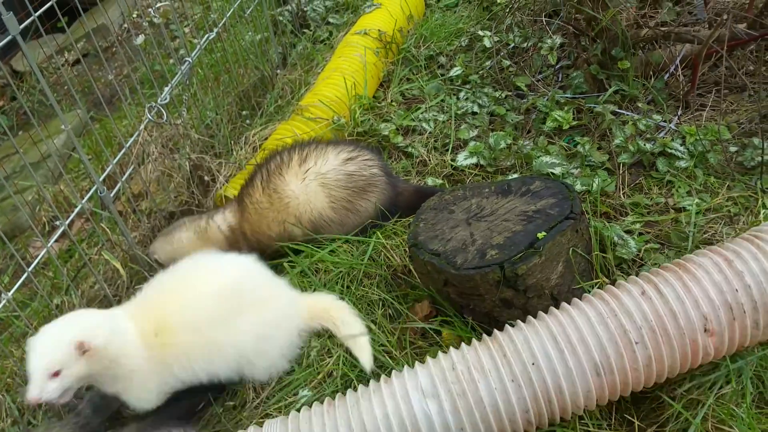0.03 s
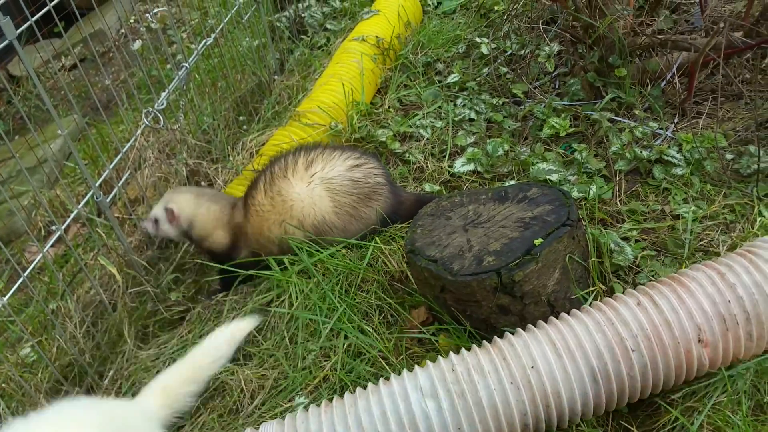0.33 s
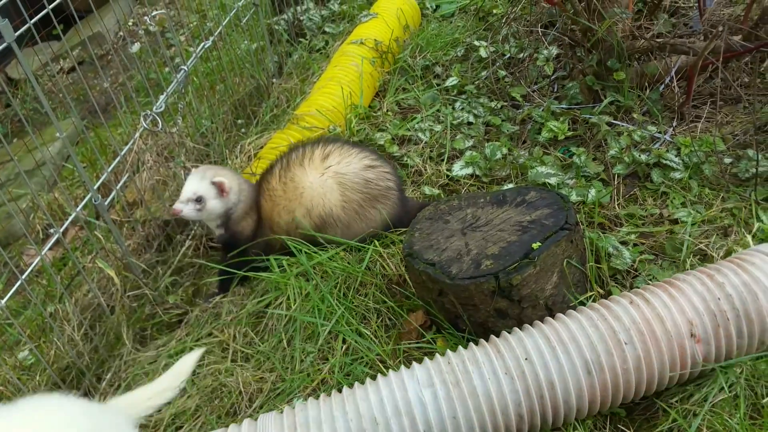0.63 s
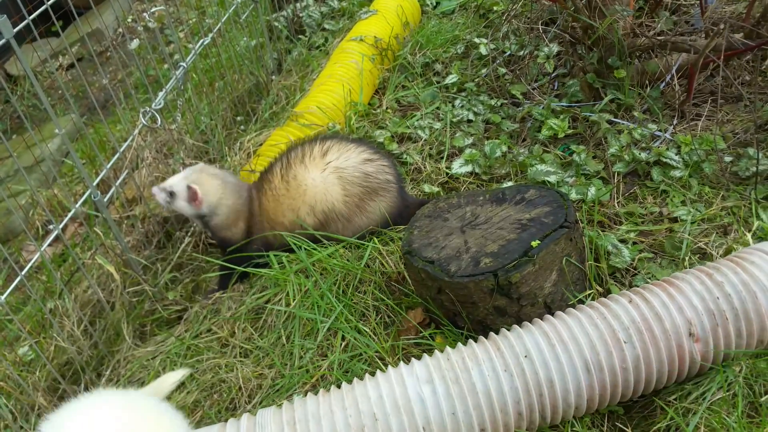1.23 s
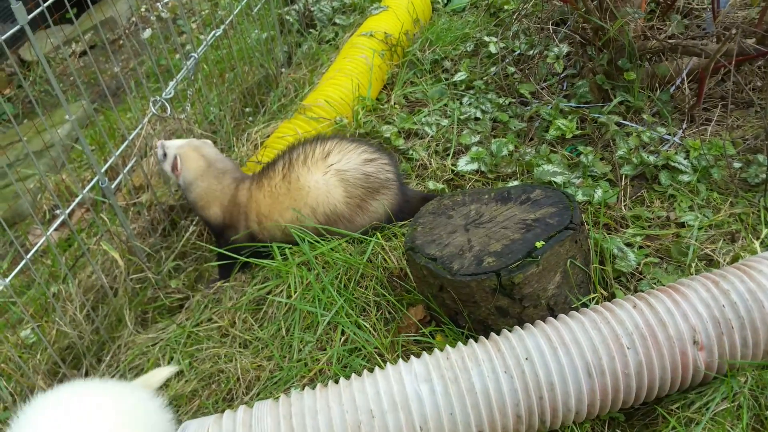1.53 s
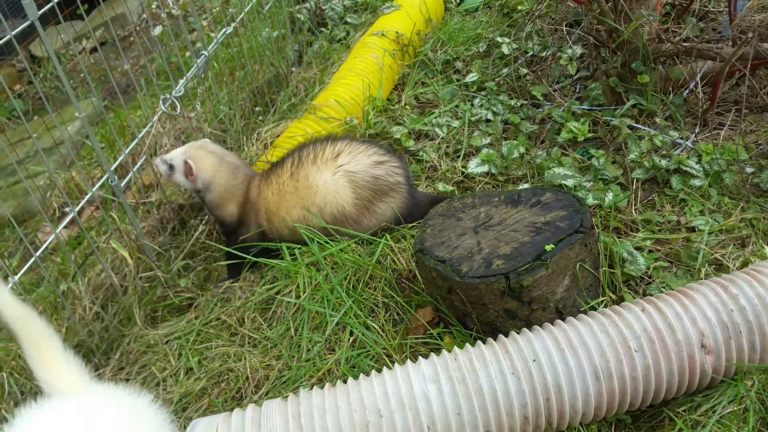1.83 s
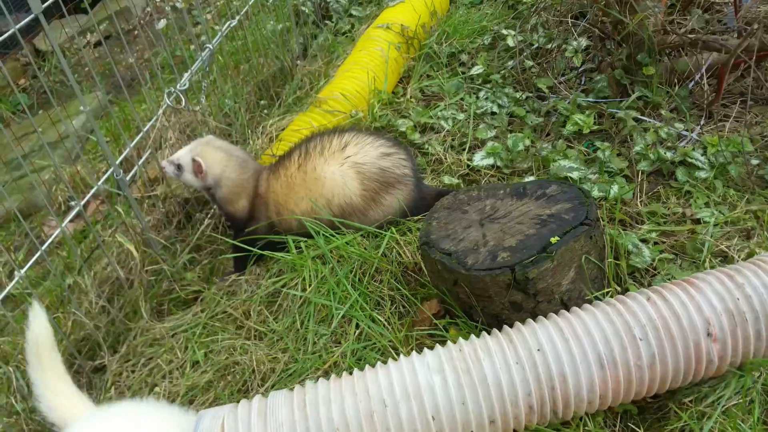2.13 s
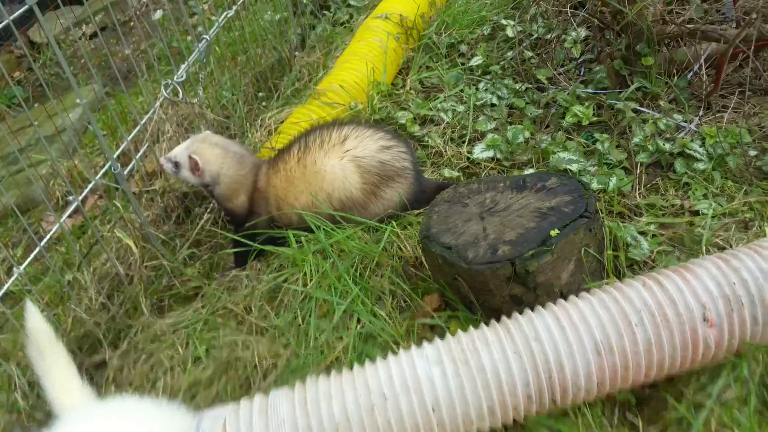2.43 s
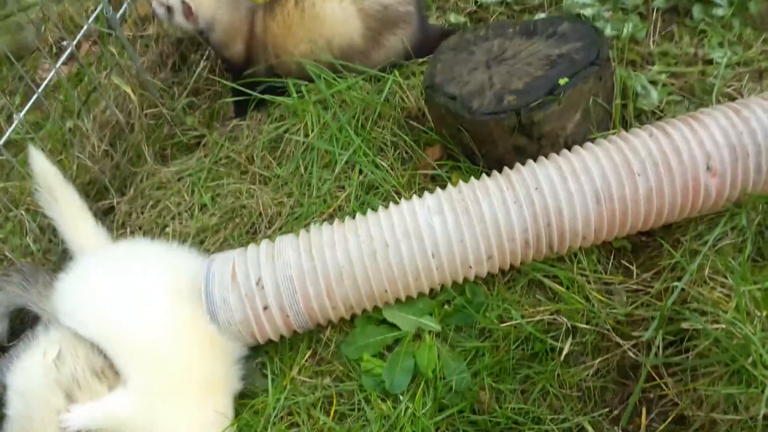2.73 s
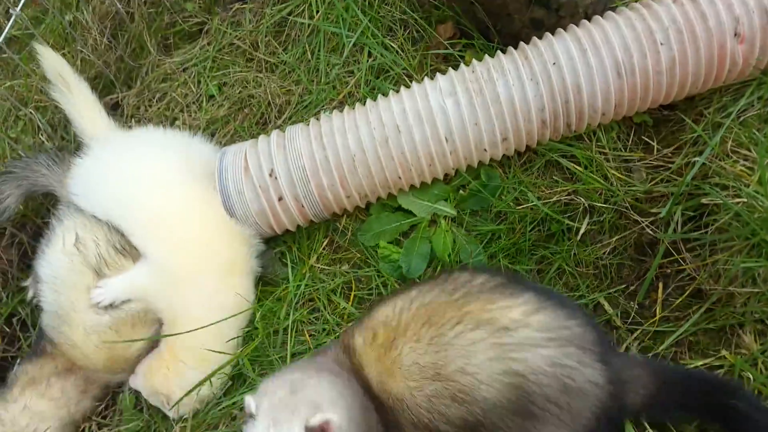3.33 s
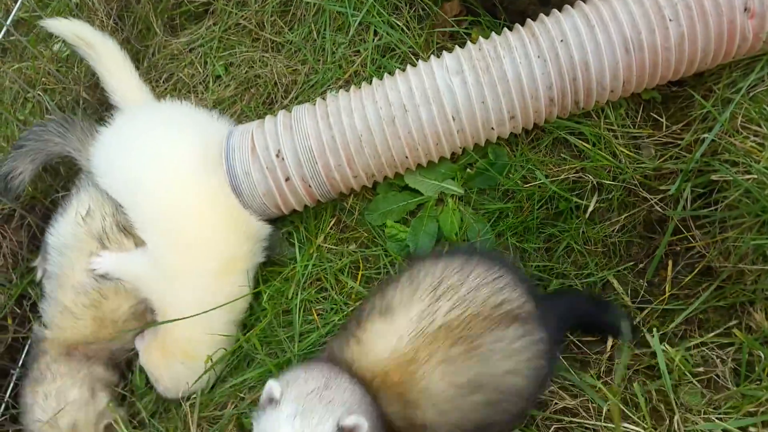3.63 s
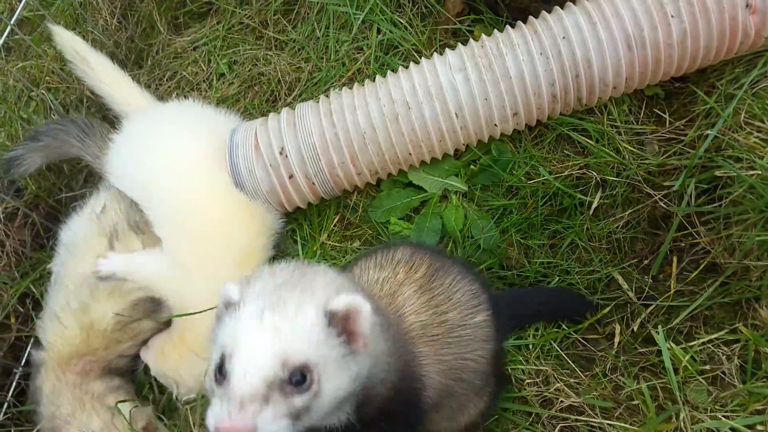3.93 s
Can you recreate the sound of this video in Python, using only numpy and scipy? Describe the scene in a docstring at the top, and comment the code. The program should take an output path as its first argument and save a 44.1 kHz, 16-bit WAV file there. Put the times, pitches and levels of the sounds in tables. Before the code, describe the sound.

Ferrets' claws click on a plastic pipe in small clusters through the first 1.3 seconds, with rustling grass and a few soft clucks. Fur brushes the pipe from 1.5 to 2.3 seconds, with sharper clicks around 2.1. Distant traffic murmurs throughout and a far bird whistles faintly. Wind bumps the microphone at the start, returns around 2 seconds and gusts hardest on the right from 3.5 seconds.

```python
"""A puff of wind bumps the microphone over a murmur of distant traffic and a faint hiss.
Ferrets potter in the grass at the mouth of a ribbed plastic pipe: claws and bodies tick over the ribs
and make the wall ring, grass rustles, and fur brushes along the pipe. An animal gives a few soft clucks
and a far bird whistles. The wind comes back in gusts, hardest on the right near the end."""
import sys
import numpy as np
from scipy import signal
from scipy.fft import rfft, irfft, next_fast_len
from scipy.io import wavfile
from scipy.ndimage import uniform_filter1d

SR = 44100
rng = np.random.default_rng(int(sys.argv[2]) if len(sys.argv) > 2 else 0)


def store_wav(level_fs):
    """Save 16-bit WAV to argv[1]."""
    pcm = np.round(np.clip(np.atleast_2d(level_fs), -1, 1) * 32767)
    wavfile.write(sys.argv[1], SR, pcm.T.astype(np.int16))


N = 176400
T = np.arange(N) / SR

# Levels in the tables are relative: the functions may turn a whole sound up or down.
# Wind strength on each side of the microphone. Each row: time in seconds, level in dB.
WIND_LEFT = [(.04,-35.5),(.18,-62),(1.55,-81),(1.67,-43),(1.74,-69),(1.94,-75),(1.98,-40),(2.1,-46),(2.49,-38.5),(2.6,-44),(3.52,-42.5),(3.6,-32),(3.73,-43),(3.795,-26.5),(4,-42.5)]
WIND_RIGHT = [(.03,-32),(.06,-36),(.22,-56.5),(.43,-78),(.51,-48.5),(.61,-43),(.68,-60),(1.95,-76),(2.17,-43.5),(2.55,-46),(2.76,-40),(2.9,-41),(3.48,-44),(3.535,-19),(3.645,-40),(3.68,-31.5),(3.71,-15),(3.8,-19.5),(3.92,-26),(4,-45.5)]
# The wind's deep tone. Each row: frequency in Hz, level in dB.
WIND_TONE = [(20,-23),(50,-3),(130,1),(200,-5.5),(280,-12.5),(420,-22.5),(700,-36),(1400,-63),(4000,-100)]
# Sharp bumps of wind. Each row: peak time in seconds, half-width in seconds, level in dB,
# left minus right in dB, rough pitch in Hz.
BUFFETS = [(0.019,0.0045,-29.5,-20,96.5),(.143,0.0035,-38.5,20,219),(2.474,0.014,-30,-8.5,88.5),(3.706,0.0076,-30,-21.5,314),(3.77,0.0078,-25.5,-19,392),(3.799,0.006,-22.5,-19,320),(3.862,0.005,-20,-17.5,103)]

# The slow swell of the traffic. Each row: time in seconds, level in dB.
TRAFFIC_LEVELS = [(0,-48.5),(1.3,-49),(2.55,-44),(4,-48)]
# The traffic's muffled tone. Each row: frequency in Hz, level in dB.
TRAFFIC_TONE = [(20,2.5),(150,6),(500,-2.5),(800,-1.5),(1300,-9.5),(2300,-11),(6000,-29),(16000,-63)]
# The rise and fall of the hiss. Each row: time in seconds, level in dB.
HISS_LEVELS = [(0,-50),(.6,-53.5),(1.25,-63),(1.9,-55.5),(3.4,-56.5),(3.53,-52.5),(3.68,-54.5)]
# The hiss's tone. Each row: frequency in Hz, level in dB.
HISS_TONE = [(1000, 3), (4000, 2.5), (8000, -2.5), (10500, 1), (13000, -4.5), (16000, 1.5)]

# Taps on the pipe. Each row: time in seconds, crack level in dB, knock level in dB, knock pitch in Hz.
TICKS = [(0.1358,-34.5,-44,2140),(0.1714,-28.5,-42,2130),(.196,-24,-27.5,2480),(.2036,-27,-32,2550),(0.231,-23,-28,2410),(0.2363,-25,-31,1780),
         (0.2552,-37.5,-36,2160),(0.2588,-36,-27,2280),(0.2697,-34,-37,1800),(0.3467,-28,-41,2790),(0.3508,-18,-28.5,2620),(0.3554,-20,-30,1690),
         (0.4139,-37,-32.5,2250),(0.535,-24,-33,2470),(0.541,-40,-32.5,2370),(0.568,-38.5,-35,2020),(.6469,-30.5,-39,1880),(.651,-26,-33,1870),
         (0.7914,-30.5,-33.5,2310),(.797,-33,-34.5,2170),(1.0305,-33.5,-44.5,2710),(1.063,-39,-30,1850),(1.1596,-37,-30.5,2170),(1.254,-40,-37.5,2430),
         (1.9146,-33.5,-42,1820),(1.925,-36,-42,2020),(2.0868,-18.5,-28.5,2380),(2.0927,-22.5,-29,2210),(2.097,-25,-41,2850),(2.1009,-23.5,-21.5,2920),
         (2.196,-32.5,-44,2960),(2.2539,-34.5,-35,2580)]
# The bright tone of a crack. Each row: frequency in Hz, level in dB.
CRACK_TONE = [(200,-19.5),(1100,-9.5),(3000,-7.5),(6500,-1.5),(10300,2),(12500,-5),(16000,-5)]
# Ways the pipe wall rings. Each row: multiple of the knock pitch, level in dB, seconds to fade by 60 dB.
PIPE_RINGS = [(1,5,0.015),(.8,-8.5,0.027),(1.62,-8,0.032)]

# How strongly the grass stirs. Each row: time in seconds, level in dB.
RUSTLE_LEVELS = [(.14,-56),(.19,-51),(.37,-45),(.48,-56.5),(.57,-41.5),(.68,-63),(.83,-45),(.99,-53.5),(1.06,-45.5),(1.12,-59.5),(1.4,-75),(1.63,-54.5),(1.84,-57),(2.05,-49.5),(2.11,-42),(2.19,-38.5),(2.24,-53),(2.28,-44),(2.35,-70),(2.83,-66),(2.89,-52),(2.97,-72)]
# The rustle's tone. Each row: frequency in Hz, level in dB.
RUSTLE_TONE = [(200,-2),(1300,2),(2200,3.5),(3500,1.5),(6000,-4),(10000,-2),(16000,-7.5)]

# Soft clucks. Each row: start in seconds, length in seconds, rough pitch in Hz, level in dB,
# brightness in dB (added once to the second harmonic and twice to the higher ones).
CLUCKS = [(0.471,0.035,277,-50,0),(0.701,0.048,333,-43,-2),(0.983,0.057,309.7,-46.5,0),(1.855,0.04,300.3,-48.5,3.5),(3.216,0.029,319,-42,-4)]
CLUCK_HARMONICS_DB = [0, -4, -6, -30, -20]  # tones at 1 to 5 times the pitch

# Bird notes. Each row: start in seconds, length in seconds, first and last pitch in Hz, level in dB.
WHISTLES = [(1.407,0.13,3640,3330,-63.5),(2.56,0.073,4250,3260,-65),(2.839,0.088,3840,4270,-60.5),(3.332,0.13,2990,3280,-64.5),(3.336,0.081,4020,3820,-66)]

# Strokes of fur on the pipe. Each row: start in seconds, length in seconds, level in dB.
BRUSHES = [(1.514,0.05,-40),(1.58,0.043,-35.5),(1.668,0.15,-35),(2.133,0.052,-33.5),(2.276,0.056,-39)]
# The tone of a stroke. Each row: frequency in Hz, level in dB.
BRUSH_TONE = [(200,3),(700,-0.5),(1500,-5),(4500,2),(7000,-4),(10000,0.5),(16000,1)]


def from_db(db):
    """Turn decibels into a number to multiply a sound by."""
    return 10 ** (np.asarray(db) / 20)


def unit_power(x):
    """Scale a sound so its average power is one."""
    return x / np.sqrt(np.mean(x ** 2) + 1e-20)


def unit_burst(x):
    """Give a burst the energy of one millisecond at a power of one."""
    return unit_power(x) * np.sqrt(.001 * SR / x.shape[-1])


def level(rows):
    """Join rows of seconds and dB into a volume curve."""
    return from_db(np.interp(T, *np.transpose(rows)))


def pan(db):
    """Left and right volumes; positive dB leans left."""
    return from_db(np.array([[db], [-db]]) / 2)


def with_tone(x, tone):
    """Filter a sound by a tone table; white noise keeps its power."""
    n = next_fast_len(2 * x.shape[-1], True) // 2 * 2
    octave = np.log2(np.maximum(np.fft.rfftfreq(n, 1 / SR), 10))
    hz, db = np.transpose(tone)
    gain = unit_power(from_db(np.interp(octave, np.log2(hz), db)))
    # Fold the filter forward in time, so it rings only after a sound arrives.
    cepstrum = irfft(np.log(gain))
    cepstrum[1:n // 2] *= 2
    cepstrum[n // 2 + 1:] = 0
    return irfft(rfft(x, n) * np.exp(rfft(cepstrum)))[..., :x.shape[-1]]


def band(x, low_hz, high_hz, order):
    """Keep mostly what lies between two frequencies."""
    return signal.sosfilt(signal.butter(order, [low_hz, high_hz], "band", fs=SR, output="sos"), x)


def noise(shared=0, size=N):
    """White stereo noise; shared runs from 0 (unrelated sides) to 1 (both the same)."""
    white = rng.standard_normal((3, size))
    return np.sqrt(shared) * white[2] + np.sqrt(1 - shared) * white[:2]


def waver(rate_hz):
    """A random wobble that slides to a new value rate_hz times a second."""
    return np.interp(T * rate_hz, np.arange(4000), rng.standard_normal(4000))


def arch(progress):
    """A rounded rise and fall as progress goes from 0 to 1."""
    return np.sin(np.pi * np.clip(progress, 0, 1))


def steadied(x, window_s=0.05):
    """Even out the slow swells of a noise but keep its quick lumps."""
    power = uniform_filter1d(x ** 2, int(window_s * SR))
    power = uniform_filter1d(power, size=441)
    return x / np.sqrt(power + 0.0099 * power.mean())


def wind():
    """Air swirls separately at each side of the microphone, making a rumble with short, sharp bumps."""
    strength = from_db(3.5) * np.array([level(WIND_LEFT), level(WIND_RIGHT)])
    out = strength * steadied(with_tone(noise(), WIND_TONE))
    for peak, width, db, pan_db, hz in BUFFETS:
        swirl = band(noise(size=N + SR), hz / 2, hz * np.sqrt(2), order=4)[:, SR:]  # 1 s to settle
        bump = np.exp(-.5 * ((T - peak) / width) ** 2)
        out += from_db(db) * pan(pan_db) * bump * steadied(swirl)
    return out


def traffic():
    """Far traffic blends into a low murmur."""
    return level(TRAFFIC_LEVELS) * with_tone(noise(shared=0.19), TRAFFIC_TONE)


def hiss():
    """A faint high hiss sinks and returns."""
    return level(HISS_LEVELS) * pan(-1) * with_tone(noise(shared=0.021), HISS_TONE)


def pipe_knock(t, hz, spread_cycles=0.52):
    """The struck wall rings with a few fading tones, a little out of step on the left and right."""
    knock = np.zeros((2, len(t)))
    for multiple, db, fade_s in PIPE_RINGS:
        fade = from_db(db - 60 * np.maximum(t, 0) / fade_s)
        cycles = multiple * hz * t + rng.random() + spread_cycles * rng.random((2, 1))
        knock += fade * np.sin(2 * np.pi * cycles)
    return knock


def pipe_ticks(rise_s=0.0004, crack_fade_s=0.00089, scatter_fade_s=0.0089):
    """Each tap is a bright crack and a hollow knock, pitched by the spot struck; both scatter briefly."""
    size, lead = 4096, 128  # samples in a tick, and before its peak
    out = np.zeros((2, N + size))
    t = (np.arange(size) - lead) / SR
    rise = np.exp(np.minimum(t, 0) / rise_s)
    snap = rise * np.exp(-np.maximum(t, 0) / crack_fade_s)
    scatter = rise * np.exp(-np.maximum(t, 0) / scatter_fade_s)
    for time, crack_db, knock_db, hz in TICKS:
        burst = noise(shared=0.063, size=size) * snap + from_db(-20.5) * noise(size=size) * scatter
        crack = from_db(3.5) * unit_burst(with_tone(burst, CRACK_TONE)) * pan(1)
        knock = from_db(-0.1) * unit_burst(rise * pipe_knock(t, hz))
        tail = from_db(-1.5) * unit_burst(band(noise(size=size) * scatter, hz / 2, hz * 2, order=1))
        start = int(time * SR) - lead
        out[:, start:start + size] += from_db(crack_db) * crack + from_db(knock_db) * (knock + tail)
    return out[:, :N]


def friction(slips_per_s, spread_db=6, slip_share=0.45, catch_db=1.9, catch_hz=189):
    """Many tiny slips of uneven size, over rubbing that catches and lets go."""
    slip_here = rng.random(N) < slips_per_s / SR
    slips = slip_here * from_db(spread_db * np.minimum(rng.exponential(1, N), 3))
    power = np.maximum(uniform_filter1d(slips ** 2, size=24), 0)
    crackle = np.sqrt(1 - slip_share + slip_share * power / power.mean())
    return noise(shared=0.059) * crackle * from_db(catch_db * waver(catch_hz))


def grass_rustle():
    """Grass stirs and crackles under the animals."""
    return with_tone(friction(slips_per_s=450) * level(RUSTLE_LEVELS), RUSTLE_TONE)


def clucks(pitch_bend=0.11, pitch_shake=0.072):
    """Short throaty notes whose pitch rises and falls with their strength."""
    out = np.zeros(N)
    wobble = 1 + pitch_shake * waver(400)
    for start, length, hz, db, bright_db in CLUCKS:
        on = (T > start) & (T < start + length)
        swell = arch((T[on] - start) / length)
        pitch = hz * wobble[on] * (1 + pitch_bend * (swell - .8))
        phase = 2 * np.pi * np.cumsum(pitch) / SR
        for k, harmonic_db in enumerate(CLUCK_HARMONICS_DB):
            gain = from_db(db + 2.5 + harmonic_db + bright_db * min(k, 2))
            out[on] += gain * swell * np.sin((k + 1) * phase)
    return out * pan(-1.6)


def bird(pitch_shake=0.037, blur_hz=459):
    """A bird whistles thin, wavering slides, blurred by distance."""
    out = np.zeros(N)
    wobble = 1 + pitch_shake * waver(500)
    for start, length, first_hz, last_hz, db in WHISTLES:
        on = (T > start) & (T < start + length)
        progress = (T[on] - start) / length
        pitch = (first_hz + (last_hz - first_hz) * progress) * wobble[on]
        out[on] += from_db(db + 9.5) * arch(progress) * np.sin(2 * np.pi * np.cumsum(pitch) / SR)
    blur = unit_power(.5 + np.array([waver(blur_hz), waver(blur_hz)]))
    return out * blur


def fur_brushes(rise_s=0.012, fade_s=0.061):
    """Fur rubs the pipe in short bright strokes that swell and fade."""
    strokes = np.zeros(N)
    for start, length, db in BRUSHES:
        rise = 1 - np.exp(-np.maximum(T - start, 0) / rise_s)
        fade = np.clip((start + length - T) / fade_s, 0, 1)
        strokes += from_db(db) * rise * fade
    return with_tone(friction(slips_per_s=800) * strokes, BRUSH_TONE)


def dull_left(x, above_hz):
    """Soften the treble on the left side only."""
    lowpass = signal.butter(2, above_hz, fs=SR, output="sos")
    return np.array([signal.sosfilt(lowpass, x[0]), x[1]])


def scene():
    """Add all the sounds together; ticks, rustle and fur are duller on the left."""
    pottering = dull_left(pipe_ticks() + grass_rustle(), above_hz=7900)
    fur = dull_left(fur_brushes(), above_hz=12300)
    return pottering + fur + clucks() + bird() + wind() + traffic() + hiss()


def record(dry):
    """Cut the very highest treble steeply."""
    cutoff_hz = 15900
    return signal.sosfilt(signal.ellip(12, .1, 80, cutoff_hz, fs=SR, output="sos"), dry)


dry = scene()
out = record(dry)
store_wav(out)
```